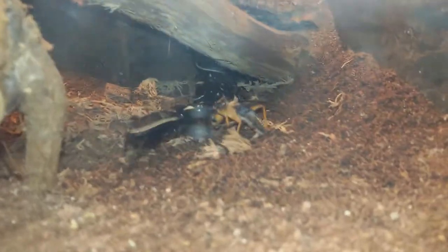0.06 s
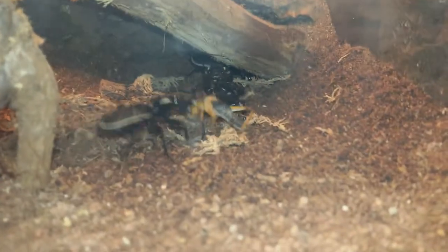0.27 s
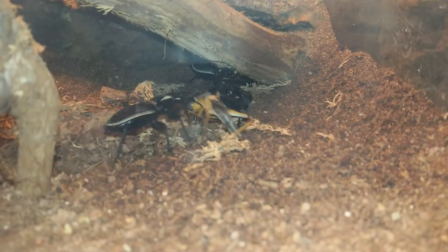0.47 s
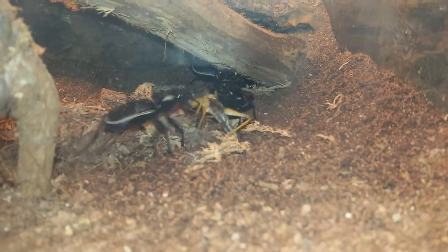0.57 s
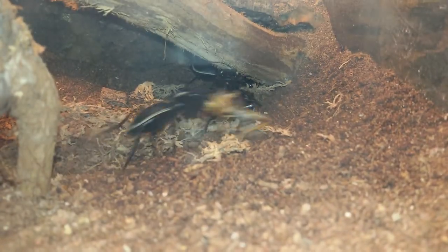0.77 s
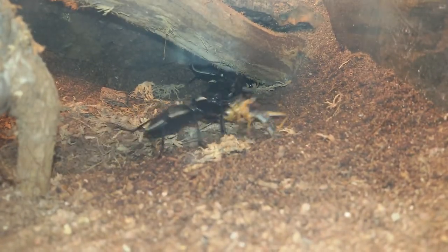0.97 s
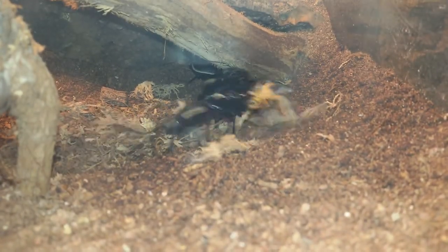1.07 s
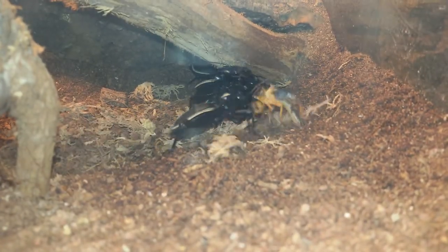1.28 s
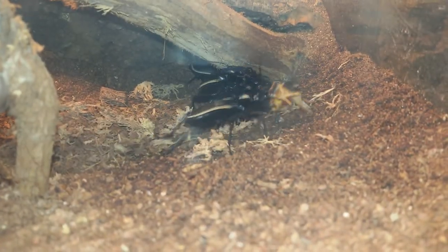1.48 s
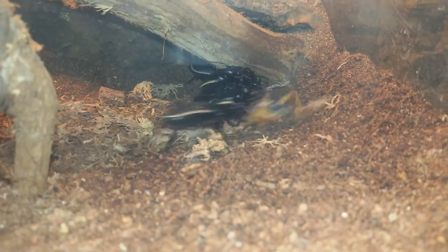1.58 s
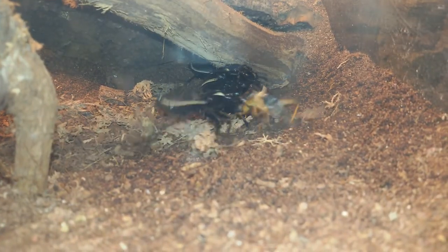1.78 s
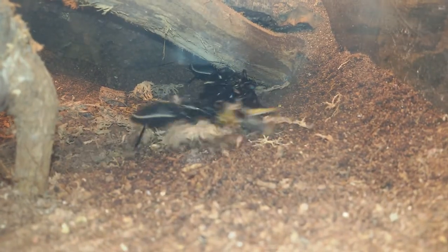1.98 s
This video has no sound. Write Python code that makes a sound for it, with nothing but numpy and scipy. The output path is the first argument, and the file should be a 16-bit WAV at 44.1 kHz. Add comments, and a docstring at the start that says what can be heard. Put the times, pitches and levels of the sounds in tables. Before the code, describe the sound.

A single sharp knock rings briefly through a terrarium in a quiet room. Around it, a close microphone catches beetles faintly scuffing soil and ticking their claws, pausing, then rustling again over a low rumble and hiss.

```python
"""Beetles wrestling in a terrarium

Two beetles wrestle on the soil in a quiet room. One sharp knock excites the damped modes of the
enclosure, and shifting weight thuds on its floor. Legs and shells scuff the litter, crushing soil
grains and setting wood chips ringing; slipping claws tick. Under it lie a low room rumble,
a faint hum and an even hiss."""
import sys
import numpy as np
from scipy import signal
from scipy.io import wavfile

SR = 44100
rng = np.random.default_rng(int(sys.argv[2]) if len(sys.argv) > 2 else 0)


def generate_wav(sig):
    """Save sig (samples, or channels by samples) to the path in sys.argv[1] as 16-bit PCM at SR."""
    pcm = np.round(np.clip(np.atleast_2d(sig).T, -1, 1) * 32767).astype(np.int16)
    wavfile.write(sys.argv[1], SR, pcm)


N = 90404
T = np.arange(N) / SR


# a light touch, then the blow (time [s], strength [dB])
IMPACTS = [(0.2247, -30.5), (.2267, 0.5)]
# modes of the enclosure (frequency [Hz], gain [dB], T60 [s])
ENCLOSURE_MODES = [(102.6, -42.5, 0.51), (151.7, -34, 0.17), (201.2, -39.5, 0.21), (294.5, -32.5, 0.15),
                   (326, -35.5, 0.13), (392, -27.5, 0.033), (496, -34, 0.034), (605, -27, 0.02),
                   (741, -58, 0.26), (894, -38, 0.05), (1039, -38.5, 0.072), (1303, -39.5, 0.081),
                   (1473, -48.5, 0.072), (2090, -47.5, 0.069), (2433, -49, 0.07), (3254, -59, 0.086),
                   (3470, -53.5, 0.024), (3670, -51, 0.031), (4170, -34.5, 0.013)]
# diffuse tail (frequency [Hz], relative spectral density [dB])
TAIL_SPECTRUM = [(90, 7.5), (250, -4.5), (600, -5.5), (1400, -10), (2000, -24), (3400, -8), (7000, -13),
                 (14000, -29)]
# decay of the tail (frequency [Hz], T60 [s])
TAIL_DECAY = [(100, 0.45), (300, 0.27), (1300, 0.19), (3500, 0.063), (8000, 0.045), (14000, 0.019)]

def knock(contact_s=0.00077):
    """Impact excitation: a force pulse and a shell's crack, then free decay, fastest in the treble."""
    clicks = np.zeros(N)
    for s, db in IMPACTS:
        clicks[int(s * SR)] += from_db(db)
    half_sine = np.sin(np.pi * np.minimum(T[:SR // 100] / contact_s, 1))
    push = from_db(-21.5) * butter(np.convolve(clicks, half_sine)[:N], 274, "high")
    crack = from_db(-5) * butter(butter(clicks, 2500, "high"), 4030, "low", order=1)
    modes = sum(from_db(db) * ring(clicks, hz, t60) for hz, db, t60 in ENCLOSURE_MODES)
    age = T - IMPACTS[-1][0]
    decay = lambda hz: (age > 0) * from_db(-60 * np.abs(age) / at_hz(TAIL_DECAY, hz))
    tail = from_db(-41.5) * coloured(white(), TAIL_SPECTRUM, decay)
    # below about 100 Hz the bass falls away steeply
    return butter(push + crack + modes + tail, 102.6, "high", order=3)


# strokes in the litter (peak time [s], level [dB], rise [s], fall [s], tilt [dB/octave])
STROKES = [(0.057, -66, 0.028, .015, -0.5), (.092, -59, 0.015, 0.0061, 1.5),
           (.108, -48.5, 0.0042, 0.0042, -0.5), (.124, -62, .008, 0.031, 4.5),
           (0.186, -62.5, .006, 0.035, 1), (.377, -59.5, 0.0026, 0.0047, -2),
           (.399, -63, 0.0043, 0.0047, 0), (0.453, -57, 0.0072, 0.011, 1), (.484, -62.5, 0.011, 0.0063, -2),
           (.775, -72, 0.062, 0.0075, -6.5), (.97, -75, .02, .05, -9.5), (1.196, -64.5, 0.0073, 0.0072, -2),
           (1.372, -69, 0.016, .012, -5), (1.395, -55.5, .011, .014, 1), (1.454, -67.5, .005, 0.0055, -5.5),
           (1.534, -65.5, 0.008, 0.0061, 5.5), (1.711, -57.5, 0.0031, 0.0098, 4),
           (1.742, -51, 0.0057, 0.0079, -4), (1.767, -62.5, 0.008, .025, 0)]
# loose soil (frequency [Hz], relative spectral density [dB])
SOIL_SPECTRUM = [(550, -1), (900, -3.5), (1700, 1), (3000, -2), (4100, -1), (5300, -4), (6400, -9),
                 (8500, -15), (14000, -25)]
# wood chip under the beetles at first (frequency [Hz], bandwidth [Hz], gain [dB])
FIRST_CHIP_MODES = [(797, 140, 4), (1430, 140, -1), (2540, 170, -1.5), (3760, 110, -1.5), (4260, 260, -1.5),
                    (6200, 180, -9), (6930, 320, -7.5)]
# wood chip where they end up (frequency [Hz], bandwidth [Hz], gain [dB])
SECOND_CHIP_MODES = [(924, 58, 1), (1270, 420, -4.5), (1830, 86, 6), (2340, 69, -4), (3390, 140, 4),
                     (4550, 100, 5), (5300, 140, -2), (5970, 200, -3.5)]

def scuffs(shift_s=0.77, pivot_hz=3000):
    """Granular friction: each stroke crushes soil grains and drives the resonances of a wood chip."""
    def force(hz):
        octaves = np.log2(max(hz, pivot_hz / 4) / pivot_hz)
        return sum(from_db(db + tilt * octaves) * swell(s, rise, fall)
                   for s, db, rise, fall, tilt in STROKES)

    first, second = grains()
    chips = np.where(T < shift_s, resonate(first, FIRST_CHIP_MODES), resonate(second, SECOND_CHIP_MODES))
    chips = butter(chips, (760, 8100), "band")
    dull = butter(chips, pivot_hz, "low", order=1)
    rasp = dull * force(pivot_hz / 2) + (chips - dull) * force(pivot_hz * 2)
    soil = coloured(grains(), SOIL_SPECTRUM, force)
    return from_db(-3.5) * (soil + rasp)


# claw slips (time [s], level [dB])
CLAW_SLIPS = [(.1330, -51), (0.4308, -59), (0.622, -51.5), (1.232, -66), (1.3434, -58)]
# one tick (frequency [Hz], relative spectral density [dB])
CLAW_SPECTRUM = [(900, -20), (2000, -1), (2700, -2), (4000, 8.5), (5000, -3), (6300, 4), (8000, -14),
                 (14000, -32)]

def ticks():
    """Stick-slip release: a claw slips off bark or shell in a bright noise burst of a few milliseconds."""
    bursts = sum(from_db(db) * swell(s, rise=0.00042, fall=0.0031) for s, db in CLAW_SLIPS)
    return bursts * coloured(white(), CLAW_SPECTRUM)


# shifts of weight (peak time [s], level [dB])
WEIGHT_SHIFTS = [(.317, -39), (.386, -52), (0.599, -48)]

def thuds(floor_hz=103):
    """Heavily damped vibration: shifting weight moves the terrarium floor for a few dull cycles."""
    return sum(from_db(db) * swell(s, rise=0.0045, fall=0.0054) * np.sin(2 * np.pi * floor_hz * (T - s))
               for s, db in WEIGHT_SHIFTS)


# room rumble (frequency [Hz], relative spectral density [dB])
RUMBLE_SPECTRUM = [(32, 0), (45, -0.5), (70, -4), (110, 0.5), (170, -7), (240, -10.5), (290, -11),
                   (390, -11.5), (480, -17), (800, -21.5), (1500, -23.5), (2500, -32.5)]
# course of the rumble (time [s], level [dB])
RUMBLE_ENVELOPE = [(0, -57), (.5, -58.5), (.7, -61), (1.02, -57.5), (1.25, -60.5), (1.7, -59), (2.05, -62)]
# hum (frequency [Hz], rms level [dB])
HUM_TONES = [(60, -68), (101.5, -66.5)]
# hiss (frequency [Hz], relative spectral density [dB])
HISS_SPECTRUM = [(200, -3.5), (1500, 3), (3000, 1), (6000, -0.5), (9000, -1.5), (13000, -1.5), (15000, -2)]
# course of the hiss (time [s], level [dB])
HISS_ENVELOPE = [(0, -66), (.2, -64.5), (.3, -63.5), (.46, -66), (.55, -68), (1.0, -67.5), (1.75, -67.5),
                 (2.05, -69)]

def room():
    """Superposition: rumble and hiss add to two tones that waver in amplitude and phase."""
    hum = 0
    for hz, db in HUM_TONES:
        amplitude = np.sqrt(2) * from_db(db + drift(8.67))
        hum += amplitude * np.sin(2 * np.pi * hz * T + 0.56 * drift(6.86))
    rumble = butter(coloured(white(), RUMBLE_SPECTRUM), 36.8, "high", order=4)
    rumble *= from_db(np.interp(T, *np.transpose(RUMBLE_ENVELOPE)))
    hiss = coloured(white(), HISS_SPECTRUM)
    hiss *= from_db(np.interp(T, *np.transpose(HISS_ENVELOPE)))
    return rumble + hum + hiss


def grains(per_s=5900, spread_db=6.5):
    """Shot noise: two streams of tiny fractures of uneven size."""
    sizes = from_db(spread_db * np.minimum(rng.exponential(1, (2, N)), 4))
    return sizes * rng.choice([-1, 1], (2, N)) * (rng.random((2, N)) < per_s / SR)


def ring(x, hz, t60):
    """Damped oscillator: a unit impulse starts a decaying sine of amplitude 1."""
    r, w = from_db(-60 / (t60 * SR)), 2 * np.pi * hz / SR
    return signal.lfilter([0, np.sin(w)], [1, -2 * r * np.cos(w), r * r], x + 1e-18)


def resonate(x, modes):
    """Modal superposition: parallel resonances of alternating sign, scaled to rms 1."""
    out = 0
    for k, (hz, width, db) in enumerate(modes):
        r, w = np.exp(-np.pi * width / SR), 2 * np.pi * hz / SR
        mode = signal.lfilter([1, 0, -1], [1, -2 * r * np.cos(w), r * r], x) * (1 - r * r) / 2
        out += (-1) ** k * from_db(db) * mode
    return rms_one(out)


def coloured(sources, spectrum, envelope=lambda hz: 1):
    """Spectral shaping: two white sources feed alternate third-octave bands, each with its envelope."""
    edges = 22 * 2 ** (np.arange(30) / 3)
    out, power = 0, 0
    for k, (low, high) in enumerate(zip(edges, edges[1:])):
        hz = np.sqrt(low * high)
        octaves_outside = max(np.log2(spectrum[0][0] / hz), np.log2(hz / spectrum[-1][0]), 0)
        gain = from_db(at_hz(spectrum, hz) - 12 * octaves_outside) * np.sqrt(high - low)
        band = rms_one(butter(sources[k % 2], [low, high], "band"))
        out += gain * envelope(hz) * band
        power += gain ** 2
    return out / np.sqrt(power)


def white():
    """Two uncorrelated white noises."""
    return rng.standard_normal((2, N))


def swell(s, rise, fall):
    """Exponential growth to a peak at time s, then exponential decay."""
    return np.exp(-np.maximum((s - T) / rise, (T - s) / fall))


def drift(per_s):
    """Random modulation: linear interpolation between values of unit variance."""
    knots = rng.standard_normal(200)
    return np.interp(T * per_s, np.arange(len(knots)), knots)


def butter(x, hz, kind, order=2):
    """Causal Butterworth filter."""
    sections = signal.butter(order, np.clip(hz, 10, .48 * SR), kind, fs=SR, output="sos")
    return signal.sosfilt(sections, x + 1e-18)


def at_hz(points, hz):
    """Interpolation on a log-frequency axis."""
    frequencies, values = np.transpose(points)
    return np.interp(np.log(hz), np.log(frequencies), values)


def from_db(db):
    """Decibels to amplitude ratio."""
    return 10 ** (np.asarray(db) / 20)


def rms_one(x):
    """Normalisation to rms 1."""
    return x / np.sqrt(np.mean(x ** 2) + 1e-20)


def scene():
    """Linear superposition: all sources add at one close microphone."""
    return (knock() + thuds() + scuffs() + ticks() + room())[None]


def record(dry, cutoff_hz=14450):
    """Band limiting: an elliptic low-pass cuts the top steeply."""
    return signal.sosfilt(signal.ellip(10, .1, 70, cutoff_hz, fs=SR, output="sos"), dry)


dry = scene()
out = record(dry)
generate_wav(out)
```